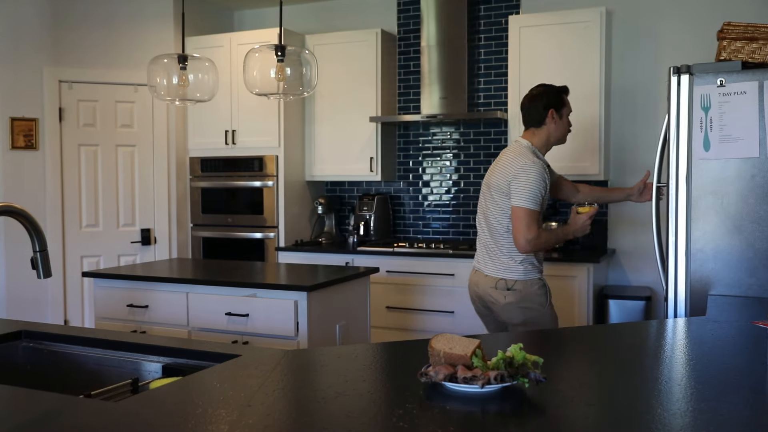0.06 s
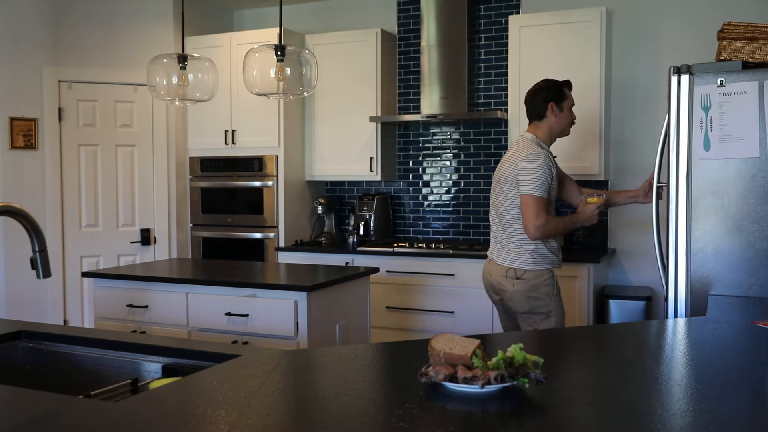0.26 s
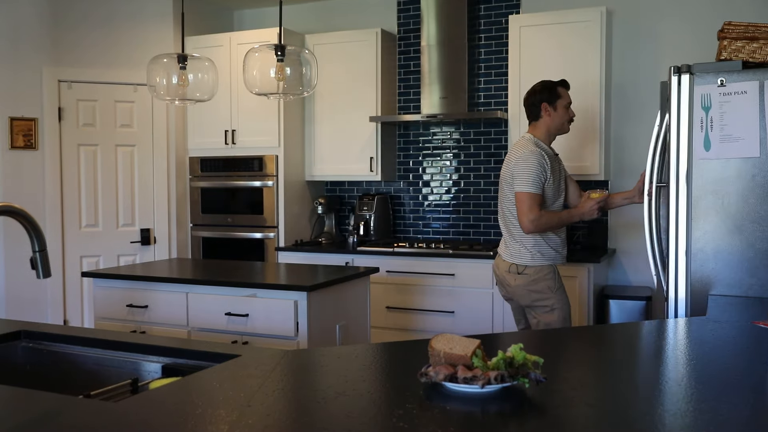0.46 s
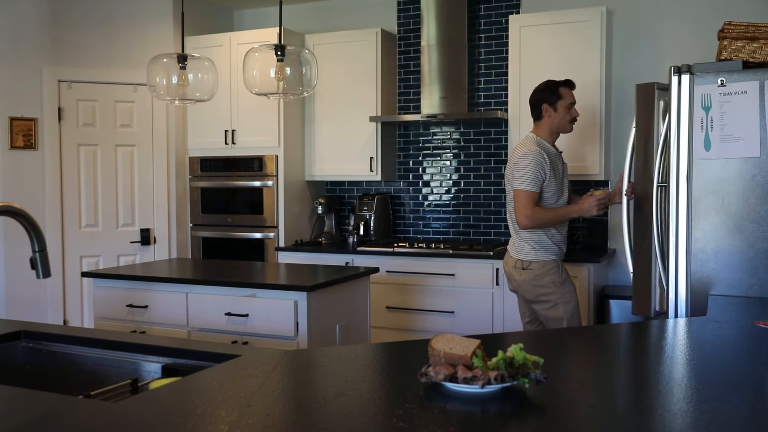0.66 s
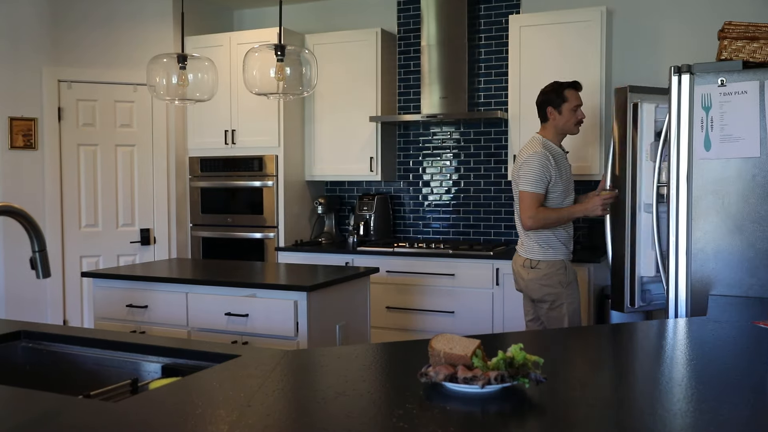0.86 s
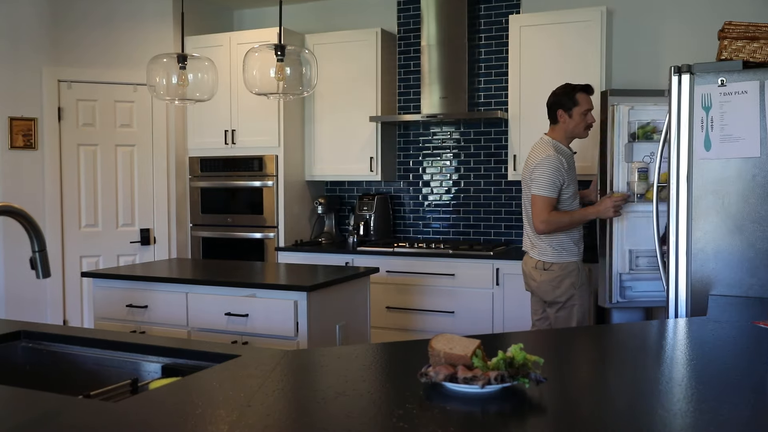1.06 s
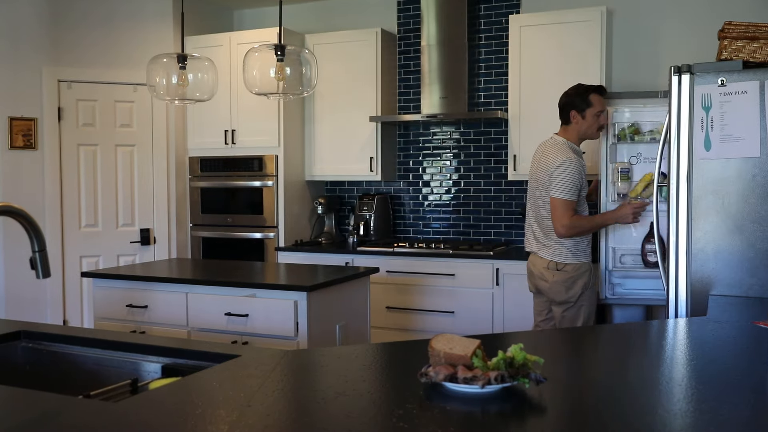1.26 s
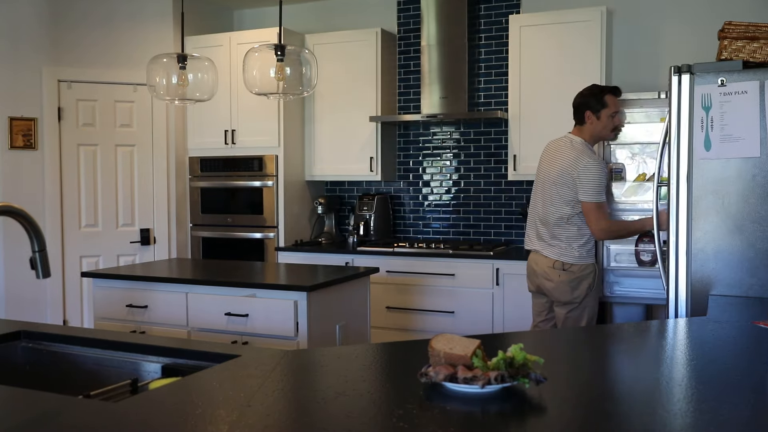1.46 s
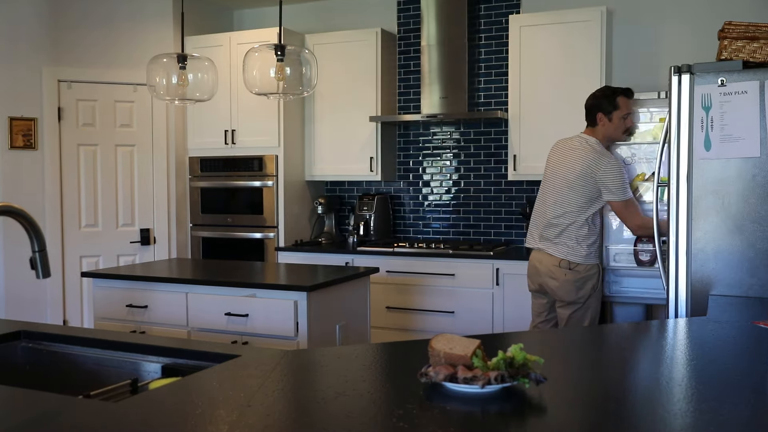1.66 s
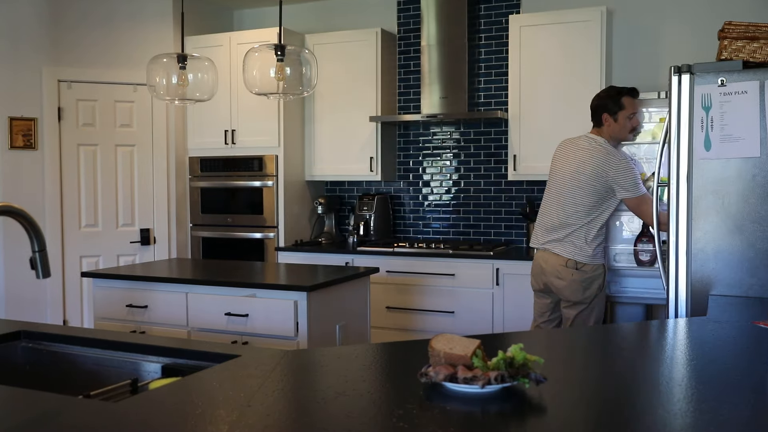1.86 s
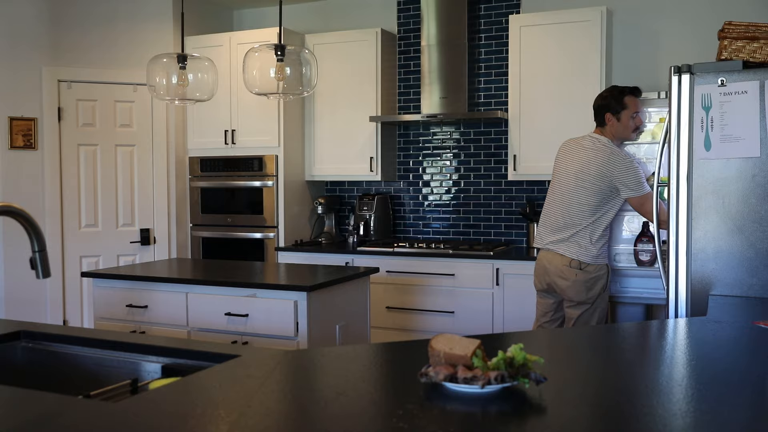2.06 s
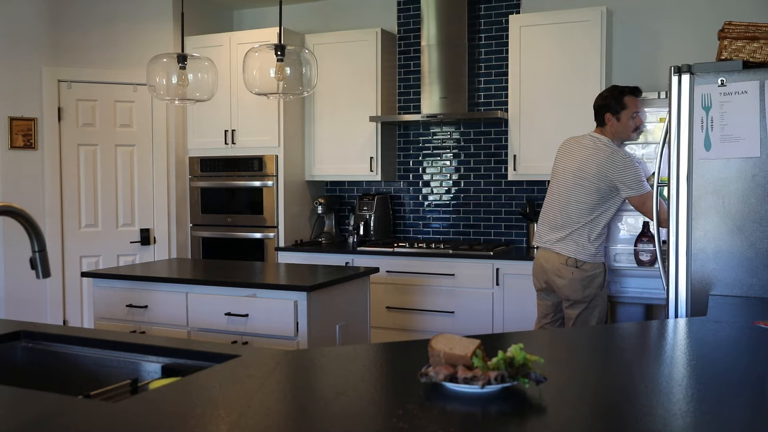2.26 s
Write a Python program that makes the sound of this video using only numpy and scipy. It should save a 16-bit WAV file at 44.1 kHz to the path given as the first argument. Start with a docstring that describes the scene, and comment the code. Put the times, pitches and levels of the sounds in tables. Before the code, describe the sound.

A refrigerator door opens: the rubber seal peels, then releases with a quick double pop and puff of air; a dull bin bump follows, then two sharp shelf knocks. Close, clean pickup in a lightly echoing kitchen.

```python
"""A refrigerator door is pulled open in a kitchen: its rubber seal peels, leaks air and lets go with a double pop.
The door swings out, the hum of the motor grows, and containers knock twice against a shelf as a hand shifts things.
Rubbing (seal, hand, sleeve, swing) is made of random tiny slips, filtered to a tone colour.
Hits are a sharp click plus dying noise, some with ringing sine waves; thuds are sines alone.
Hum is steady sines, air is filtered noise, and the room's echo is noise that follows the energy fed to it."""
import sys
import numpy as np
from scipy import signal
from scipy.fft import rfft, irfft, next_fast_len
from scipy.io import wavfile
from scipy.ndimage import uniform_filter1d

SR = 44100
rng = np.random.default_rng(int(sys.argv[2]) if len(sys.argv) > 2 else 0)


def to_wav(s):
    """Save 16-bit WAV."""
    ch = np.atleast_2d(s).T  # columns
    pcm = np.round(np.clip(ch, -1, 1) * 32767)  # PCM
    wavfile.write(sys.argv[1], SR, pcm.astype(np.int16))


N = 101077  # length in samples
T = np.arange(N) / SR  # time in seconds


def from_db(db):
    """Turn decibels into a gain."""
    return 10 ** (np.asarray(db) / 20)


def rms_one(x):
    """Scale to an average power of one."""
    return x / np.sqrt(np.mean(x ** 2) + 1e-20)


def level(curve):
    """Draw a gain over time through (t/s, level/dB) points."""
    return from_db(np.interp(T, *np.transpose(curve)))


def at_hz(points, hz):
    """Read a table between its points, with pitch on a log scale as the ear hears it."""
    f, v = np.transpose(points)
    return np.interp(np.log(hz + 1), np.log(f), v)


def around(shape, hz):
    """Move a spectrum shape to a centre frequency."""
    return [(max(k * hz, 1), db) for k, db in shape]


def noise():
    """White noise: every frequency equally strong."""
    return rng.standard_normal(N)


def colour(x, spectrum):
    """Filter a sound to a spectrum without smearing it ahead in time; white noise keeps its power."""
    n = 2 * next_fast_len(len(x) // 2 + 4096)
    hz = np.arange(n // 2 + 1) * SR / n
    gain = rms_one(from_db(at_hz(spectrum, hz)))
    # folding the cepstrum makes the filter respond as early as it can
    cepstrum = irfft(np.log(gain + 1e-9))
    cepstrum[1:n // 2] *= 2
    cepstrum[n // 2 + 1:] = 0
    response = np.exp(rfft(cepstrum))
    return irfft(rfft(x, n) * response)[:len(x)]


def octaves(x):
    """Split a sound into overlapping octave bands that add back up to it: (centre in Hz, band)."""
    spectrum = rfft(x)
    hz = np.arange(len(x) // 2 + 1) * SR / len(x)
    octave = np.log2(np.clip(hz, 64, 16384))  # the end bands take all that lies beyond
    return [(2. ** k, irfft(spectrum * np.maximum(0, 1 - abs(octave - k)), len(x))) for k in range(6, 15)]


def fade(t60, size):
    """Die away by 60 dB in t60 seconds."""
    return np.exp(-np.log(1000) * T[:size] / t60)


def dying_noise(t60s, size=16384):
    """Stand in for countless crowded resonances: bands of noise, each dying at its own rate."""
    bands = octaves(rng.standard_normal(size))
    return sum(band * fade(at_hz(t60s, hz), size) for hz, band in bands)


def ring(hz, t60, size=16384):
    """Ring one resonance: a sine wave that dies away."""
    return np.sin(2 * np.pi * hz * T[:size]) * fade(t60, size)


def ring_all(modes):
    """Ring several (f/Hz, level/dB, t60/s) resonances, every other one flipped in sign."""
    return sum(from_db(db) * (-1) ** k * ring(hz, t60) for k, (hz, db, t60) in enumerate(modes))


def blow(spectrum, t60s, modes, crack_db, dense_db):
    """Hit a body: a sharp crack, its crowded resonances and its few strong ones."""
    x = from_db(dense_db) * dying_noise(t60s)
    x[0] += from_db(crack_db)
    return colour(x, spectrum) + ring_all(modes)


def place(x, s, db):
    """Put a short sound at its time with its gain."""
    return from_db(db) * np.pad(x, (max(0, int(s * SR)), N))[:N]


def grains(per_s, spread_db):
    """Friction as random tiny slips of uneven size, scaled to unit power."""
    sizes = from_db(spread_db * np.minimum(rng.exponential(1, N), 4)) * rng.choice([-1, 1], N)
    slips = rng.random(N) < per_s / SR
    return rms_one(sizes * slips)


def lag(x, seconds):
    """Smooth a signal so that it follows changes slowly."""
    r = np.exp(-1 / (seconds * SR))
    return signal.lfilter([1 - r], [1, -r], x)


def background():
    """The motor's hum is steady sines; its fan and the still air of the room are filtered noise."""
    # loudness of motor and fan together: t/s, level/dB
    hum_curve = [(0, -63), (.15, -69), (.85, -68.5), (1, -60.5), (1.25, -65), (1.5, -58), (2.0, -56),
                 (2.29, -53.5)]
    # steady tones of the motor: f/Hz, level/dB
    hum_lines = [(53.6, -2), (210, -25.5), (447, -18)]
    # spectrum of the cold-air fan: f/Hz, level/dB
    fan_spectrum = [(60, -7), (110, -17), (160, -5.5), (215, 6.5), (290, -1), (420, 1), (600, -7),
                    (900, -31), (3000, -32)]
    # spectrum of the room's air: f/Hz, level/dB
    air_spectrum = [(30, -13), (80, -13), (200, -16), (400, -16), (700, -28), (1600, -21.5), (5000, -23.5),
                    (15800, -24)]
    fan_db, air_db = -8, -61  # the fan is set against the hum
    hum = sum(np.sqrt(2) * from_db(db) * np.sin(2 * np.pi * (hz * T + rng.random())) for hz, db in hum_lines)
    fan = from_db(fan_db) * colour(noise(), fan_spectrum)
    air = from_db(air_db) * colour(noise(), air_spectrum)
    return level(hum_curve) * (hum + fan) + air


def side_hiss():
    """Faint filtered noise, later given opposite signs in the two ears so that it sounds wide."""
    # spectrum: f/Hz, level/dB
    side_spectrum = [(18, -30), (30, -0.5), (256, -3.5), (292, -2), (332, -7), (443, -1.5), (518, -7.5),
                     (3320, -6), (15500, -4)]
    return from_db(-62) * colour(noise(), side_spectrum)


def grip():
    """The hand settles on the handle: skin rubs in many tiny slips."""
    # loudness: t/s, level/dB
    grip_curve = [(0, -55.5), (.055, -59.5), (.068, -49), (.1, -56), (.13, -59), (.2, -65), (.25, -82)]
    # spectrum: f/Hz, level/dB
    grip_spectrum = [(100, -31), (250, -5), (550, 3), (1000, 2.5), (1600, -11), (2300, -4), (4000, -16),
                     (12000, -37)]
    return level(grip_curve) * colour(grains(5500, spread_db=4.0), grip_spectrum)


def sleeve():
    """A sleeve rustles as the arm moves: cloth rubs in tiny slips."""
    # loudness: t/s, level/dB
    sleeve_curve = [(0, -65), (.13, -77), (.165, -59), (.21, -68), (.27, -57), (.35, -78), (.375, -52),
                    (.41, -63.5), (.9, -89), (1.12, -70), (1.19, -62), (1.28, -70), (1.35, -91),
                    (2.08, -87), (2.15, -61), (2.21, -60), (2.29, -56)]
    # spectrum: f/Hz, level/dB
    sleeve_spectrum = [(2000, -26), (4500, -3), (6600, 1), (8500, -4), (11000, -3.5), (15000, -7)]
    return level(sleeve_curve) * colour(grains(3000, spread_db=3.8), sleeve_spectrum)


def taps():
    """Small things tap each other: a click and short noise around each one's own pitch."""
    # taps: t/s, level/dB, pitch f/Hz
    tap_times = [(0.061, -50, 930), (1.2405, -50.5, 820), (1.3153, -57, 1500), (1.885, -51, 1110)]
    # spectrum: multiple of the pitch, level/dB
    tap_shape = [(.2, -29), (.65, -1), (1, 6), (1.5, -10), (4, -17), (12, -46)]
    # time to die by 60 dB: f/Hz, t60/s
    tap_t60 = [(500, 0.035), (4000, 0.09)]
    return sum(place(blow(around(tap_shape, hz), tap_t60, [], crack_db=16, dense_db=1), s, db)
               for s, db, hz in tap_times)


def peeling():
    """The seal comes off the frame in uneven clumps of tiny slips, as the rubber catches and lets go."""
    # pull on the seal, heard as the level of its peeling: t/s, level/dB
    peel_curve = [(.2, -90), (.22, -50.5), (.245, -50.5), (.265, -39.5), (.288, -40.5), (.33, -43.5),
                  (.36, -42), (.39, -54), (.44, -51), (.505, -48.5), (.52, -41.5), (.542, -44), (.56, -69)]
    # spectrum: f/Hz, level/dB
    peel_spectrum = [(24, -14), (40, -4), (234, -0.5), (276, -5.5), (425, 0), (653, -2), (809, 1.5),
                     (912, -5), (1540, -14), (1700, -13), (2610, -14), (4200, -23), (12000, -46.5),
                     (15600, -83), (22000, -120)]
    catch_db, catch_per_s = 0.5, 160  # strength and speed of the unevenness
    catch = rms_one(uniform_filter1d(noise(), max(2, int(SR / catch_per_s))))
    unevenness = from_db(catch_db * np.clip(catch, -2, 2))
    slips = grains(4000, spread_db=2.5)
    return colour(level(peel_curve) * unevenness * slips, peel_spectrum)


def thuds():
    """The heavy door shudders: a low tone that dies quickly."""
    # shudders: t/s, level/dB
    thud_times = [(.275, -52), (0.546, -34), (0.679, -38.5)]
    return sum(place(ring(56, t60=0.065), s, db) for s, db in thud_times)


def pops():
    """The seal snaps free in places, the last of it almost at once, and each snap sets the door ringing."""
    # snaps: t/s, level/dB
    pop_times = [(0.287, -44.5), (0.3175, -43.5), (0.35, -38.5), (0.4574, -43), (.467, -37),
                 (0.5456, -17.5), (.5470, -23.5), (0.5667, -16), (.575, -25.5), (0.6126, -32)]
    # spectrum of the door: f/Hz, level/dB
    door_spectrum = [(29, -50), (50, -17.5), (201, -2.5), (310, -12), (466, 3.5), (525, -2.5), (790, -7.5),
                     (1000, 0.5), (1250, -9), (1470, -7.5), (2020, -27.5), (2220, -15.5), (4560, -24.5),
                     (6380, -30), (15500, -45)]
    # time to die by 60 dB: f/Hz, t60/s
    door_t60 = [(100, 0.12), (500, 0.082), (2000, 0.05), (10000, 0.053)]
    # strong resonances: f/Hz, level/dB, t60/s
    door_modes = [(156, -21, 0.091), (210, -22, 0.058), (458, -20, 0.22), (990, -18.5, 0.12),
                  (986, 2.5, 0.015), (1088, -20, 0.096), (1176, -15.5, 0.11), (2090, -16, 0.05)]
    return sum(place(blow(door_spectrum, door_t60, door_modes, crack_db=18, dense_db=-3), s, db)
               for s, db in pop_times)


def leaks():
    """Air slips through the opening seal: puffs of noise around a pitch, quick to start and slower to fade."""
    # puffs: t/s, fade length/s, level/dB, centre f/Hz
    leak_times = [(0.365, 0.092, -45, 1560), (.516, 0.017, -37, 1030), (0.53, 0.018, -35.5, 2300),
                  (0.547, 0.069, -27, 2220)]
    # spectrum: multiple of the centre, level/dB
    leak_shape = [(.25, -6), (.65, -3.5), (1, 4), (1.45, -5), (2.3, -16), (6.5, -49)]
    out = 0
    for s, length, db, hz in leak_times:
        puff = np.interp(T, [s, s + 0.0028, s + length], [0, 1, 0])
        out = out + from_db(db) * colour(noise(), around(leak_shape, hz)) * puff
    return out


def steps():
    """Soft steps and shifts of weight on the floor: dull noise that dies away."""
    # steps: t/s, level/dB
    step_times = [(0.461, -46), (.95, -53), (1.141, -60), (1.408, -52.5), (1.897, -53)]
    # spectrum: f/Hz, level/dB
    step_spectrum = [(50, -39), (100, -5), (155, 5.5), (230, -11), (500, -8), (2000, -51)]
    # time to die by 60 dB: f/Hz, t60/s
    step_t60 = [(100, 0.21), (1000, 0.19)]
    return sum(place(colour(dying_noise(step_t60), step_spectrum), s, db) for s, db in step_times)


def ripping():
    """The last stretch of seal rips away in a short burst of crackle."""
    # spectrum: f/Hz, level/dB
    rip_spectrum = [(100, -15), (450, -10), (1200, 5.5), (2400, 6), (4500, -10), (7000, -17), (15000, -29)]
    start_s, length_s, rip_db = .5435, 0.026, -24.5
    burst = np.interp(T, [start_s, start_s + 0.0018, start_s + length_s], [0, 1, 0])
    return from_db(rip_db) * colour(burst * grains(1200, spread_db=3.5), rip_spectrum)


def swing():
    """The swinging door and its load rustle faintly, in sparse tiny slips."""
    # loudness: t/s, level/dB
    swing_curve = [(.6, -67), (.85, -59.5), (.96, -57.5), (1.08, -62.5), (1.17, -63), (1.3, -64),
                   (1.5, -85)]
    # spectrum: f/Hz, level/dB
    swing_spectrum = [(53, -42), (90, -7), (154, 0.5), (309, -3), (606, -2), (1020, -11), (1100, -9),
                      (1750, -14), (9000, -25.5), (11700, -68), (19800, -120)]
    return level(swing_curve) * colour(grains(900, spread_db=2.3), swing_spectrum)


def bumps():
    """Things in the door bin bump dully and make the bin ring."""
    # bumps: t/s, level/dB
    bump_times = [(0.954, -54), (1.002, -58), (1.143, -56), (1.371, -32.5), (1.4109, -48.5), (1.428, -48.5),
                  (1.903, -58.5)]
    # spectrum of the bin: f/Hz, level/dB
    bin_spectrum = [(100, -22), (250, -9.5), (450, -4), (800, -4.5), (1500, -7.5), (2300, -26), (5000, -26),
                    (14000, -38)]
    # time to die by 60 dB: f/Hz, t60/s
    bin_t60 = [(200, 0.28), (700, 0.065), (2000, 0.083), (8000, 0.025)]
    # strong resonances: f/Hz, level/dB, t60/s
    bin_modes = [(442, 2, 0.079), (582, 0.5, 0.062), (698, -8.5, 0.18), (763, -7, 0.079),
                 (1017, -6.5, 0.12), (1500, -10.5, 0.052), (1820, -19, .07), (2272, -18, 0.12)]
    return sum(place(blow(bin_spectrum, bin_t60, bin_modes, crack_db=9, dense_db=-1.5), s, db)
               for s, db in bump_times)


def ticks():
    """A light piece of plastic ticks: a bright click and short noise."""
    # ticks: t/s, level/dB
    tick_times = [(1.7623, -42), (1.767, -43)]
    # spectrum: f/Hz, level/dB
    tick_spectrum = [(530, -53), (900, -15), (1320, -4), (2100, -13), (3140, -1), (3580, -12), (3890, -4),
                     (5240, -3.5), (15500, -13.5)]
    # time to die by 60 dB: f/Hz, t60/s
    tick_t60 = [(1000, 0.15), (4000, .1), (12000, 0.066)]
    return sum(place(blow(tick_spectrum, tick_t60, [], crack_db=9, dense_db=-0.5), s, db)
               for s, db in tick_times)


def shelf():
    """Each knock is a quick run of contacts: a clatter, plus shelf tones whose mix depends on the place hit."""
    # contacts: t/s, level/dB, place along the shelf 0-1, how squarely it sets the shelf ringing 0-1
    knock_times = [(2.0784, -15, 0, 0.73), (2.0812, -18, 0.2, 0.18), (2.0872, -26, 0, 0.5),
                   (2.2519, -37, 0.7, 0), (2.257, -22, 1, 0.12), (2.2597, -17.5, 1, 0.9),
                   (2.2626, -19.5, 1, 0.05), (2.271, -25, 1, 0)]
    # spectrum of the clatter: f/Hz, level/dB
    shelf_spectrum = [(41, -33), (70, -14.5), (193, -19), (333, 2), (547, -3.5), (962, -2.5), (1210, -3),
                      (1380, -1.5), (1980, -6.5), (2120, -4.5), (2600, -1.5), (4090, -5.5), (5010, -9.5),
                      (12900, -31.5), (15500, -42)]
    # time for the clatter to die by 60 dB: f/Hz, t60/s
    shelf_t60 = [(100, 0.28), (350, .11), (1000, 0.077), (3000, .06), (10000, 0.056)]
    # shelf tones: f/Hz, level/dB if struck at one end, level/dB at the other, t60/s
    shelf_modes = [(363.6, -12.5, -8, 0.17), (637, -19, -9.5, 0.14), (842, -9.5, -34, 0.12),
                   (946, -10, -4, 0.056), (1055, -31, -1, 0.046), (1376, -0.5, -0.5, 0.061),
                   (1636, -40, -4.5, 0.081), (1793, -3.5, -15, 0.043), (1962, -14, -5, 0.09),
                   (2596, -9, -7.5, 0.023), (3150, -26, -2, 0.036), (3620, -18, -10, 0.068),
                   (4000, -28, -6.5, 0.05), (4630, -19, -9, 0.039)]
    out = 0
    for s, db, where, square in knock_times:
        where = np.clip(where, 0, 1)
        tones = ring_all([(hz, a + (b - a) * where, t60) for hz, a, b, t60 in shelf_modes])
        clatter = blow(shelf_spectrum, shelf_t60, [], crack_db=11, dense_db=-2.0)
        out = out + place(clatter + square * tones, s, db)
    return out


def kitchen(x):
    """Echo of the room: each band stores the energy it is fed and loses it at its own rate."""
    # time to die by 60 dB: f/Hz, t60/s
    room_t60 = [(100, 0.32), (500, 0.7), (2000, 0.69), (5000, 0.5), (12000, 0.18)]
    # strength of the echo: f/Hz, level/dB
    room_spectrum = [(60, -4.5), (280, 4), (550, -1), (1000, -2.5), (3000, 1), (6000, -1.5), (14000, 3)]
    build_s = 0.016  # the echo swells this slowly
    size, out = next_fast_len(N + 8192), 0
    sound_bands = octaves(np.pad(x, (0, size - N)))
    noise_bands = octaves(rng.standard_normal(size))
    for (hz, band), (_, field) in zip(sound_bands, noise_bands):
        fed = lag(band ** 2, build_s)
        stored = lag(fed, at_hz(room_t60, hz) / np.log(10 ** 6))
        out = out + from_db(at_hz(room_spectrum, hz)) * np.sqrt(stored) * rms_one(field)
    return out[:N]


def scene():
    """All sounds stand in the centre; only the hiss spreads."""
    seal = peeling() + ripping()
    door = thuds() + pops() + leaks() + swing()
    items = taps() + bumps() + ticks()
    knocks = shelf()
    person = grip() + sleeve() + steps()
    # how much of each group feeds the room's echo
    send = from_db(-11) * seal + from_db(-11.5) * door + from_db(-19.5) * items + from_db(-18) * knocks
    mid = seal + door + items + knocks + person + kitchen(send) + background()
    side = side_hiss()
    return np.array([mid + side, mid - side])


def record(dry):
    """Cut the top of the treble steeply, above 16 kHz."""
    low_pass = signal.ellip(12, .1, 70, 16000, fs=SR, output="sos")
    return signal.sosfilt(low_pass, dry)


dry = scene()
out = record(dry)
to_wav(out)
```